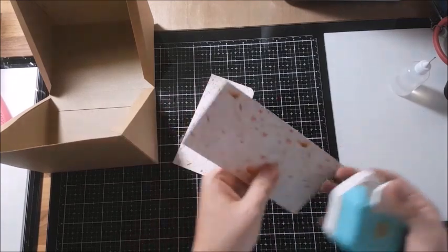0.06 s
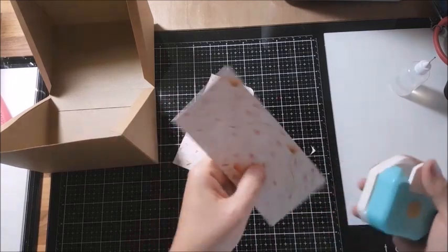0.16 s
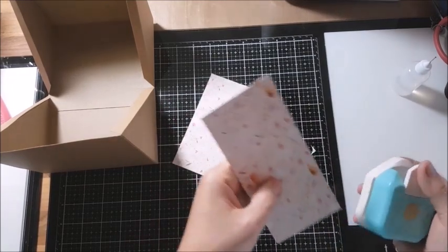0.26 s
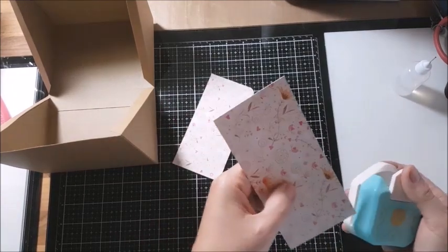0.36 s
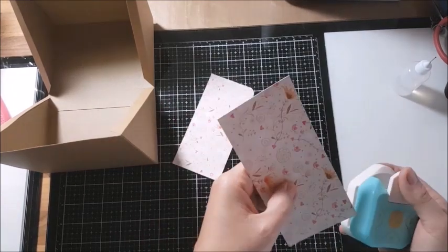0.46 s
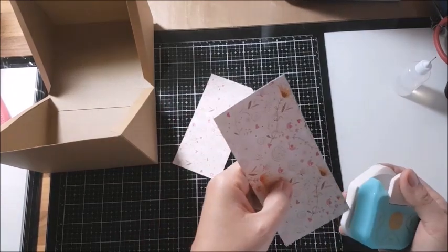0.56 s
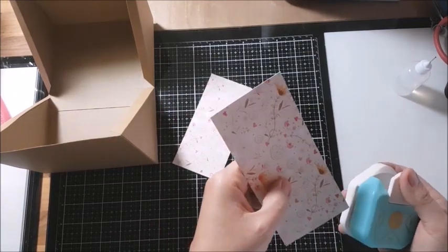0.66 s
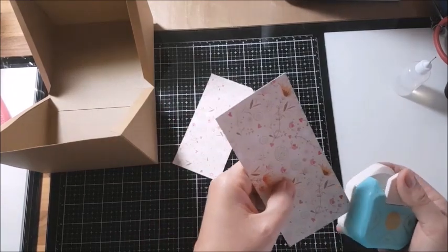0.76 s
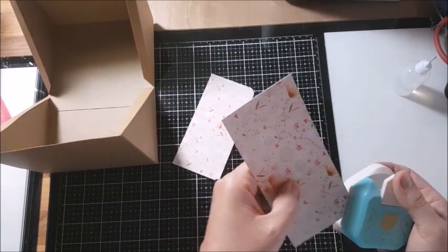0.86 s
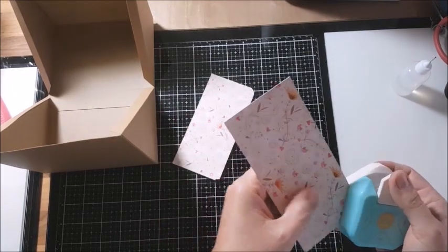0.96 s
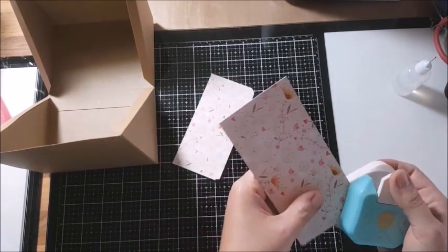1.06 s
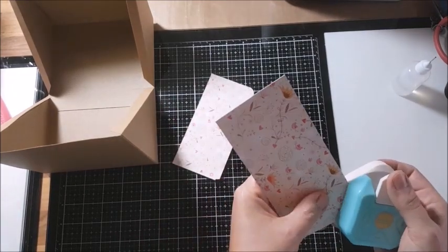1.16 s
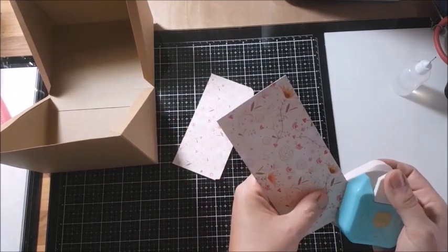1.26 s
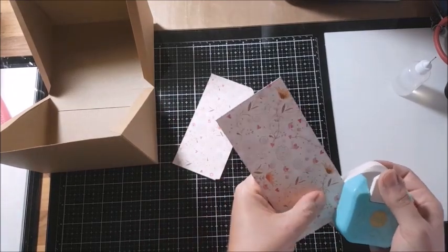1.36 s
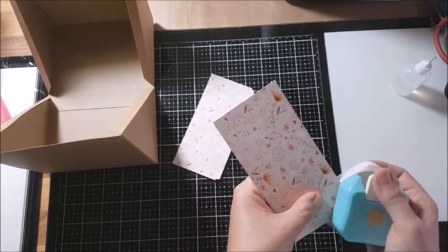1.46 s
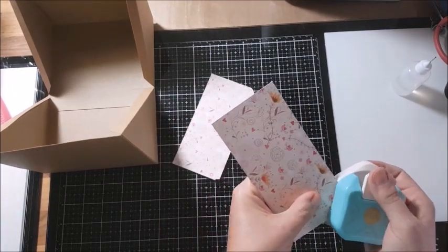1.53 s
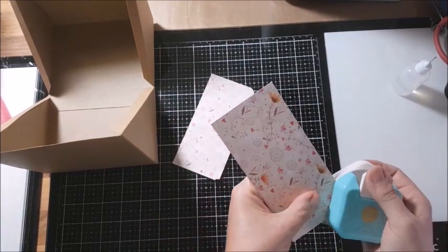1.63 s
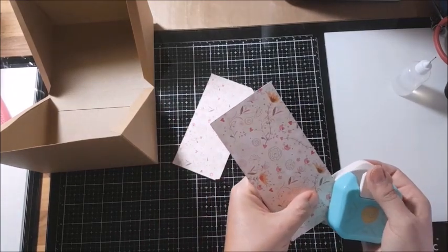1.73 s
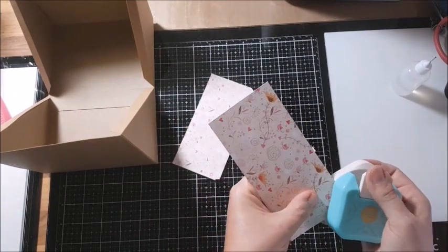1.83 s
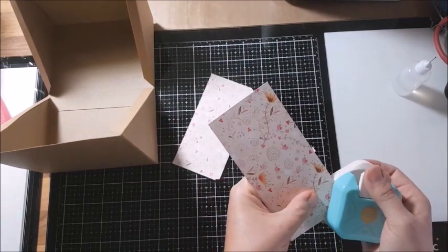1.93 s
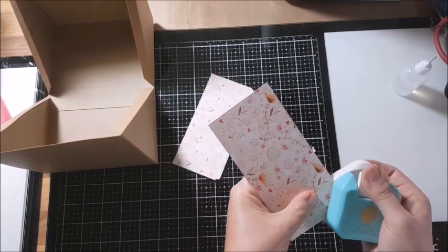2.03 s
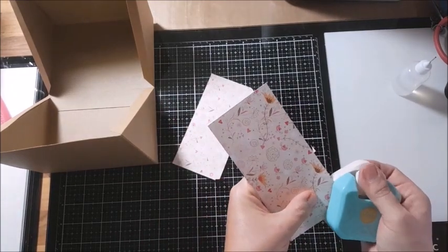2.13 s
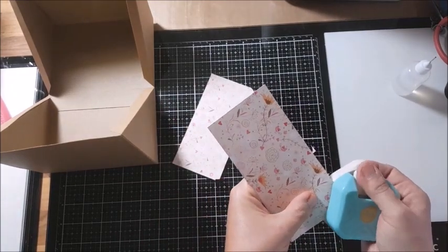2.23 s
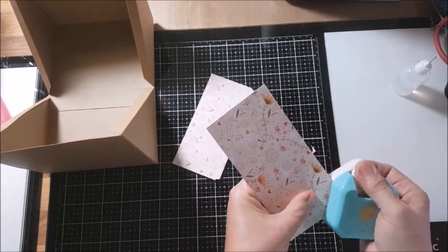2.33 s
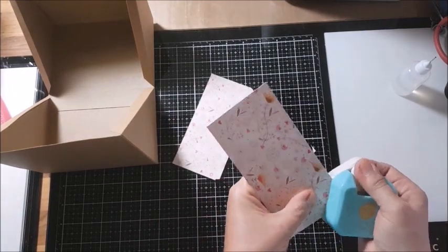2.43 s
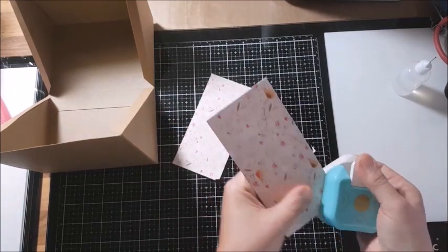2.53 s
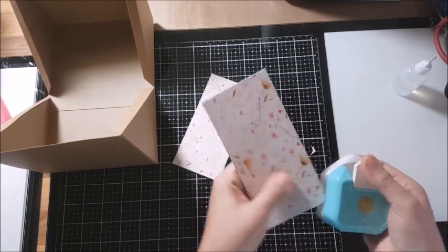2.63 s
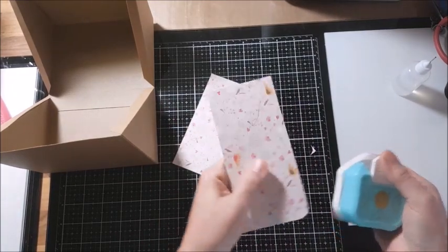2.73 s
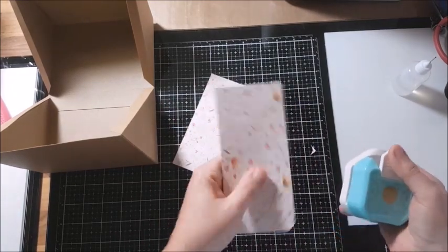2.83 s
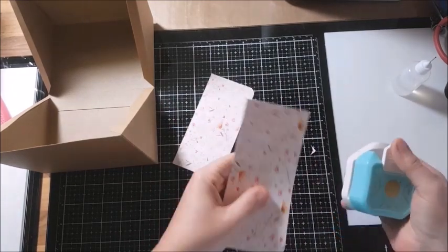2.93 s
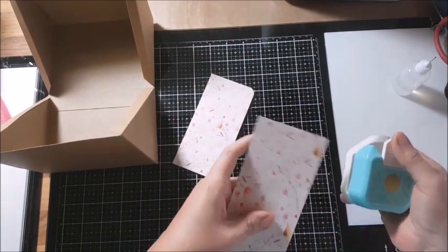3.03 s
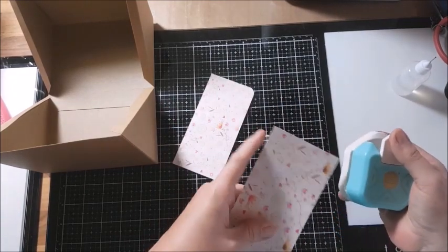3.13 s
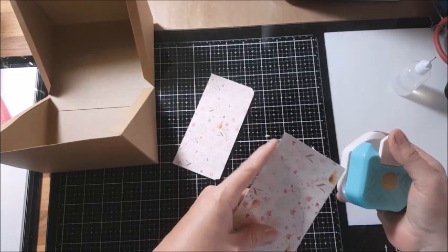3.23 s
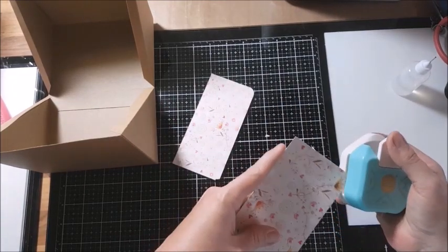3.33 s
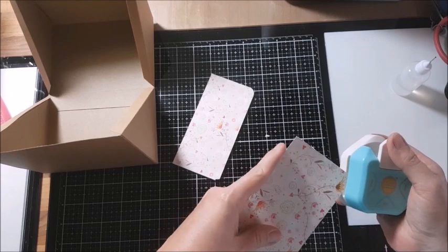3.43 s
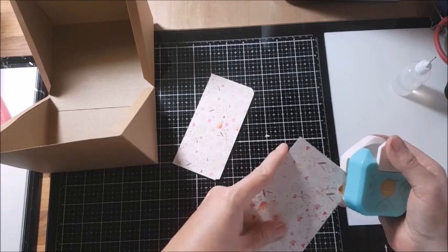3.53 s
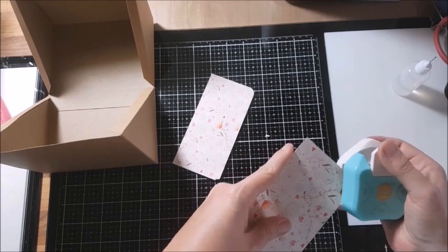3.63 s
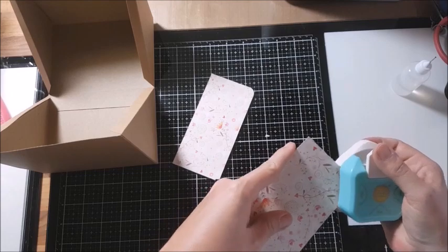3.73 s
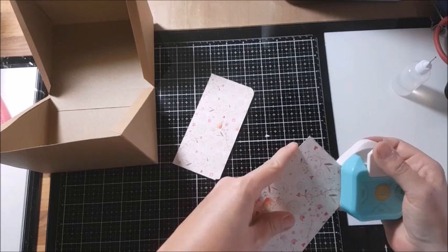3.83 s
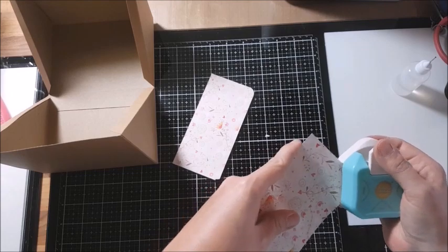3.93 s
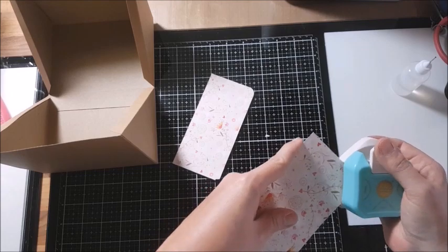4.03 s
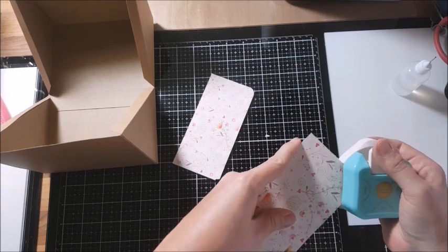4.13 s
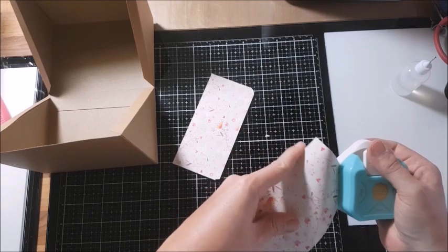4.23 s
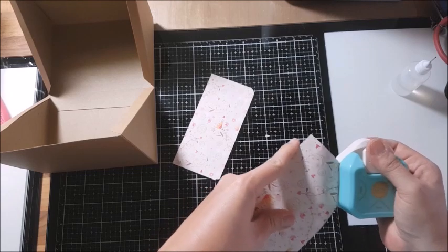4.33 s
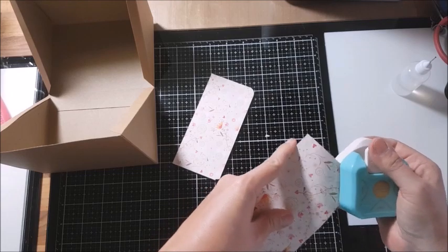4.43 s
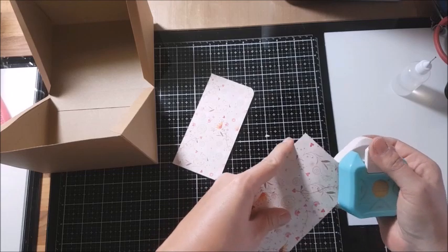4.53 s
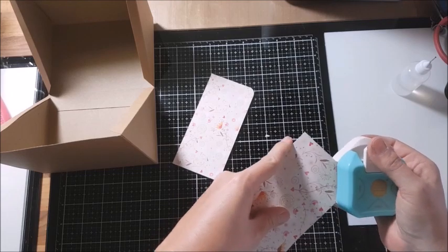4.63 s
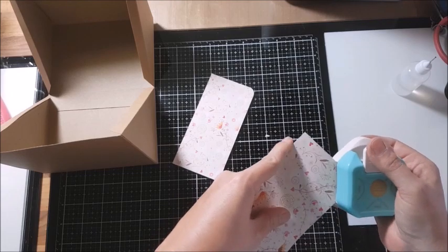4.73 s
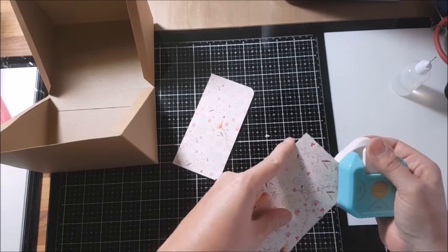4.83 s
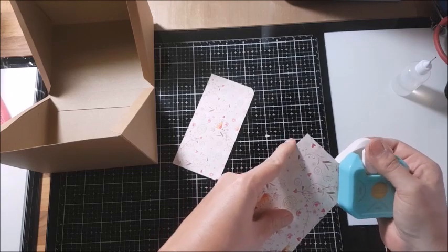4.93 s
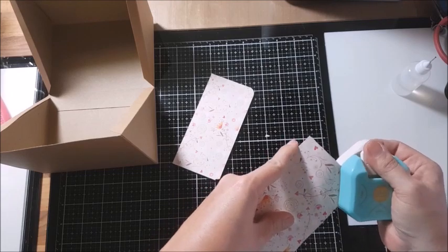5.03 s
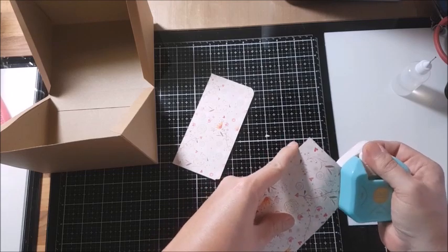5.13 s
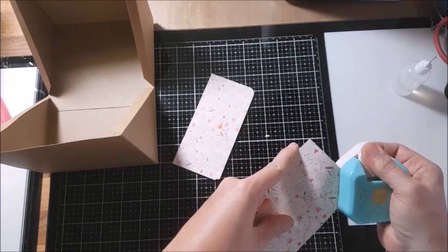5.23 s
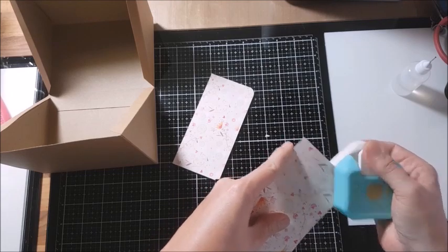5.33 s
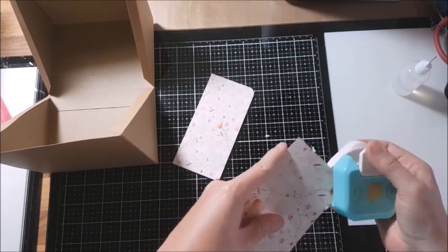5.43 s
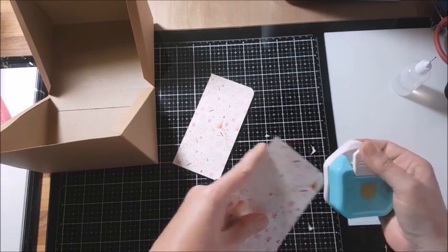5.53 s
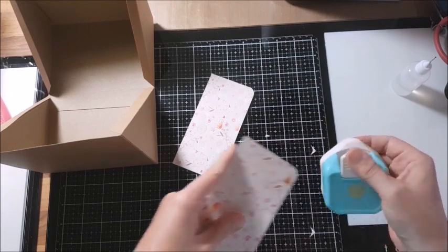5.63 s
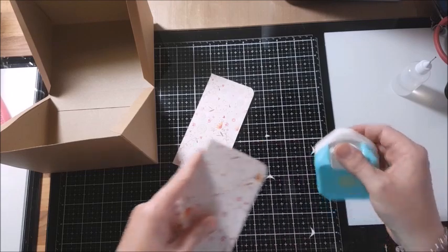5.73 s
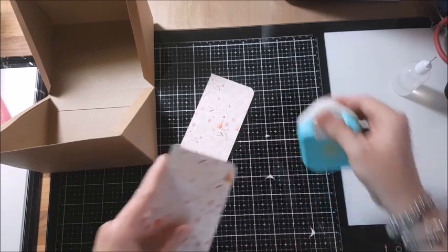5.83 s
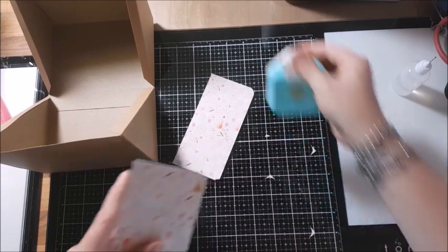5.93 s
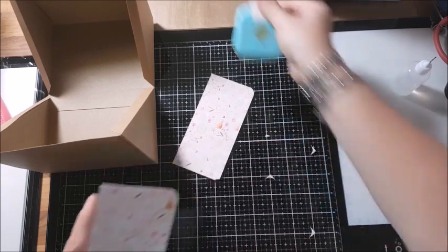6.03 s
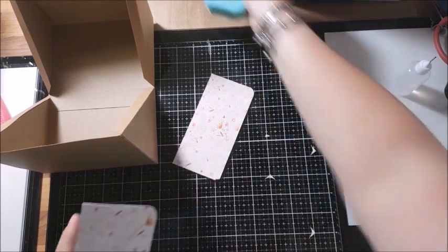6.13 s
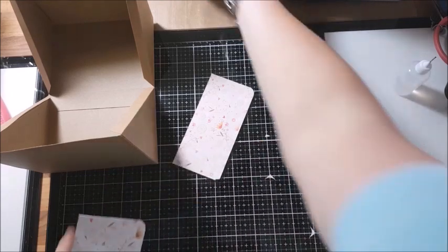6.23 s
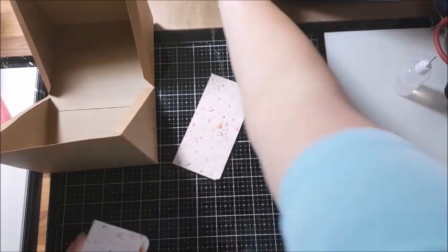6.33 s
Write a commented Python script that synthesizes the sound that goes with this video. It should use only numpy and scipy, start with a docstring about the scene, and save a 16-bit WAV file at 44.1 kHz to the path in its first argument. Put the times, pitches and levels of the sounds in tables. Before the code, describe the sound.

A close stereo pickup in a small room, hands slightly right of centre, over quiet, airy fan noise. From 0 to 1.3 s there are faint card slides, a hollow palm shift and tiny plastic bumps at 0.05 and 0.67. At 2.2 a light knock and short gritty rub lead to a very loud, bright snap at 2.39, with dry plastic ring, thin spring note and quick wall echoes. A sharp double click releases the lever at 2.62. The fan dips around 2.85 and creeps back while card hisses near 3.0. Small knocks come at 3.54 and 3.65. The bent card pops crisply at 4.41, with smaller crackles around it. Soft taps and rubbing from 5.04 precede the second loud snap at 5.24; a quick rattling release follows at 5.43-5.49, with a faint scrape. From 5.9 light card slides and the punch gently skidding aside close the scene by about 6.5.

```python
"""Corner punch on card, small room

Close stereo microphone at a craft table, hands a little to the right: a plastic punch rounds two card corners.
Noise-driven jerks make the scrapes; damped modes and a noise crack make each snap, with a thin spring note.
Before, between and after the cuts, shaped noise is card sliding and palm shifting; at the end the punch
slides aside. Parts knock and the bent card pops; the walls answer with noise echoes. Filtered noise is a
background fan, heard to drop for a moment after the first snap and creep back."""
import sys
import numpy as np
from scipy import signal
from scipy.fft import rfft, irfft, next_fast_len
from scipy.io import wavfile
from scipy.ndimage import uniform_filter1d, minimum_filter1d, map_coordinates

SR = 44100
rng = np.random.default_rng(int(sys.argv[2]) if len(sys.argv) > 2 else 0)


def wav_record(signal):
    """Record a signal, one row per channel, as 16-bit PCM in the file named by sys.argv[1]."""
    frames = np.transpose(np.atleast_2d(signal))
    bounded = np.clip(frames, -1, 1)
    # unit amplitude maps onto the largest positive 16-bit level
    quanta = np.round(bounded * 32767).astype(np.int16)
    wavfile.write(sys.argv[1], SR, quanta)


N = 281446  # length [samples]
T = np.arange(SR // 2) / SR  # time axis of one short sound [s]

# Fan air noise: (frequency [Hz], level [dB])
FAN_AIR_SPECTRUM = [(20, -14), (45, -19), (100, -11.5), (220, -11.5), (320, -6), (395, -1.5), (540, -7),
                    (800, -3.5), (1050, -5.5), (1850, -2), (2400, -8.5), (3500, -19), (6000, -27.5),
                    (10000, -30), (15000, -28)]
# Fan likeness at the two microphone ports: (frequency [Hz], left-right correlation [0-1])
FAN_LIKENESS = [(60, 0.098), (300, 0.36), (640, 0.65), (1400, 0.11), (3000, .25), (8000, .05)]
# Fan balance: (frequency [Hz], left minus right [dB])
FAN_BALANCE = [(60, 3), (200, -2.5), (700, -1.5), (2000, -4), (4400, -2), (9000, 3)]
FAN_DB = -55
# the fan noise drops for a moment after the first snap: lowest time, depth, fall and recovery
SAG_S, SAG_DB, SAG_FALL_S, SAG_RECOVER_S = 2.85, -3.5, 0.26, 0.42

# Palm shifting on the hollow case: (start [s], length [s], level [dB])
PALM_SHIFTS = [(-.1, 0.54, -63.5), (.35, 0.63, -59), (1.2, 0.55, -68), (3.4, 0.62, -63.5),
               (4.1, 0.7, -66.5), (6.1, 0.54, -55.5)]
# Hollow case under the palm: (frequency [Hz], level [dB])
HOLLOW_SPECTRUM = [(40, -25), (220, -21), (300, -11.5), (340, 1), (400, -13.5), (600, -20.5), (1200, -19),
                   (2700, -26), (4000, -32), (5200, -34), (6500, -65)]
# Fingers sliding over the card: (start [s], length [s], level [dB])
CARD_SLIDES = [(.02, .13, -63), (.28, 0.027, -70), (.43, .11, -68), (.62, 0.034, -63), (.94, .19, -65),
               (1.04, 0.053, -65.5), (1.195, 0.05, -60.5), (2.71, 0.16, -67), (2.925, .11, -63),
               (3.02, 0.075, -58), (3.60, 0.077, -70), (3.765, 0.048, -69), (3.985, 0.037, -70),
               (4.26, 0.054, -65), (4.55, 0.067, -76), (5.87, 0.21, -75), (6.04, 0.25, -71),
               (6.178, 0.02, -58), (6.225, .03, -67), (6.305, 0.043, -56.5)]
# Card hiss between the fingers: (frequency [Hz], level [dB])
PAPER_SPECTRUM = [(500, -5), (2000, -4.5), (3000, 2.5), (6000, -2), (8200, 2.5), (10000, -2.5), (14000, 1),
                  (16000, -17)]
# Punch sliding aside: (frequency [Hz], level [dB])
SKID_SPECTRUM = [(300, -26), (1100, -2), (2700, -1), (3800, -25), (4700, -2), (5200, 3), (6000, -24),
                 (15000, -25.5)]
PALM_EDGE_S, SLIDE_EDGE_S = 0.25, 0.009  # longest rise and fall of a movement
SKID_S, SKID_LENGTH_S, SKID_DB, SKID_EDGE_S = 6.17, .4, -62.5, 0.28

# Plastic and card bumping: (time [s], knock level [dB], knock frequency [Hz], tick level [dB])
CONTACTS = [(.045, -25, 480, -34), (.062, -29, 466, -48), (.667, -32, 422, -44), (2.1835, -32, 600, -33),
            (2.2565, -19, 616, -23), (2.6032, -28.5, 640, -39), (2.617, -20, 1540, -42),
            (2.6217, -11, 1560, -12), (2.6231, -15, 2810, -13), (3.5365, -24.5, 530, -37.5),
            (3.538, -42, 4200, -47), (3.647, -33, 605, -39), (4.530, -28.5, 657, -26.5),
            (5.0955, -20.5, 555, -25), (5.1005, -23.5, 680, -24), (5.4309, -25.5, 637, -24.5),
            (5.4693, -16.5, 460, -24), (5.4725, -15.5, 990, -24), (5.4785, -18, 1575, -18),
            (5.4903, -27, 2840, -18.5)]
# Dry tick of a contact: (frequency [Hz], level [dB])
TICK_SPECTRUM = [(100, -20), (400, -9.5), (900, -10), (1700, 3.5), (3100, -4), (5000, -9.5), (8200, -12.5),
                 (10500, -11), (15000, -16)]
TICK_T60_S = .013
# Bass-shy radiation of the small case: (frequency [Hz], gain [dB])
CASE_RADIATION = [(30, -17), (120, -5), (220, -24), (340, 4), (1000, 1)]

# Card buckling: (time [s], level [dB])
BUCKLES = [(0.2372, -32.5), (4.3243, -22), (4.4117, -4), (4.4182, -11), (4.525, -33), (4.538, -29),
           (4.563, -29.5)]
# Papery crack of the bent card: (frequency [Hz], level [dB])
BUCKLE_SPECTRUM = [(100, -40), (350, -24), (1150, -16), (1850, -0.5), (2400, -7), (3000, -1.5),
                   (4200, -9.5), (6200, -13.5), (8500, -17.5), (10500, -26), (13500, -22), (16000, -39)]

# Lever rubbing in its guide, down and up; last row: card drawn out of the punch:
# (start [s], length [s], groan level [dB], grit level [dB], swell per jerk [dB])
RUBS = [(2.188, .071, -51.5, -53.5, 1.04), (2.617, 0.026, -50, -43, -11), (5.039, 0.062, -55.5, -57.5, 6.5),
        (5.468, 0.047, -38.5, -40.5, -15), (5.576, 0.076, -53.5, -63, -0.5)]
# Shuddering case: (frequency [Hz], level [dB])
GROAN_SPECTRUM = [(60, -24), (280, -18), (450, -0.5), (660, 1.5), (880, -10), (1550, -3.5), (2600, -2.5),
                  (3800, -10.5), (6000, -23), (15000, -37)]
# Hiss of the rubbing faces: (frequency [Hz], level [dB])
GRIT_SPECTRUM = [(100, -23.5), (700, -13.5), (1600, -1.5), (2600, 1), (4000, -2.5), (6500, -5), (8200, 6),
                 (9500, -8.5), (14000, -4.5), (16000, -14)]
JERK_SPACING_S, JERK_WIDTH_S = .026, 0.0063  # nominal spacing; standard deviation of one jerk

# Blade breaking through:
# (time [s], shell [dB], bass change [dB], crack [dB], crack tilt [dB per octave], long ring change [dB])
BLADE_SNAPS = [(2.3875, 0.5, -1.5, 7, -1, -5), (5.2362, -3.5, 5.5, 9, -0.6, -7)]
# Punch case modes, damped shell then long faint ring: (frequency [Hz], relative level [dB], t60 [s])
PUNCH_MODES = [(417, -12.5, 0.012), (545, -15, 0.009), (1361, 9.5, 0.0096), (1525, -5.5, 0.016),
               (2190, -11, 0.011), (3150, -10, 0.0039), (3996, 0, 0.0089), (354.5, -37.5, 0.13),
               (744, -33.5, 0.18), (1299, -18, 0.14), (1380, -36, 0.19), (1509, -37, 0.18),
               (3900, -33.5, 0.17), (4000, -37, 0.11)]
# Card shearing, before the tilt of each snap: (frequency [Hz], level [dB])
SHEAR_SPECTRUM = [(60, -18), (250, -7.5), (900, -10), (2000, 1.5), (3100, 5.5), (4200, 6), (5800, 0.5),
                  (7200, 4.5), (8200, 2.5), (10000, -3.5), (12000, -0.5), (13000, 8), (14200, 0.5),
                  (15800, -8)]
SHARP_ATTACK_S = .0002

# Jolted return spring: (time [s], level [dB])
SPRING_JOLTS = [(2.388, -44), (5.237, -40)]

# Room decay: (frequency [Hz], t60 [s])
ROOM_DECAY = [(150, 0.13), (500, 0.22), (1400, 0.18), (4000, 0.24), (8000, 0.21), (15000, 0.18)]
# Wall colour: (frequency [Hz], relative reflected level [dB])
WALL_REFLECTION = [(150, -10.5), (450, -1.5), (1000, -2.5), (1400, 3.5), (3500, 4), (5500, 2.5), (8000, 5),
                   (14000, 5)]
FIRST_WALL_S, CRACK_WET_DB, RUBBING_WET_DB = .0098, -4.3, -4

LIMITER_S, TOP_HZ = .0006, 15900


def amp(db):
    """Decibels to gain."""
    return 10 ** (np.asarray(db) / 20)


def unit(x):
    """Scale to rms 1."""
    return x / np.sqrt(np.mean(x ** 2) + 1e-20)


def packet(x):
    """Scale to energy 1."""
    return x / np.linalg.norm(x)


def along(points, hz):
    """Read (frequency [Hz], value) points on a log frequency axis."""
    f, v = np.transpose(points)
    return np.interp(np.log(hz + 1), np.log(f + 1), v)


def wobble(rate):
    """A smooth random curve with rate knots a second."""
    knots = rng.standard_normal(int(N * rate / SR) + 4)
    return map_coordinates(knots, [np.arange(N) * rate / SR])


def filtered(x, response):
    """Multiply the spectrum of x by a complex response of frequency."""
    n = x.shape[-1]
    m = next_fast_len(n + SR // 4)
    return irfft(rfft(x, m) * response(np.fft.rfftfreq(m, 1 / SR)), m)[..., :n]


def coloured(x, spectrum, size=4096):
    """Colour x with a causal minimum-phase filter, made by folding the cepstrum."""
    cepstrum = irfft(np.log(amp(along(spectrum, np.fft.rfftfreq(size, 1 / SR)))))
    cepstrum[1:size // 2] *= 2
    cepstrum[size // 2 + 1:] = 0
    impulse = irfft(np.exp(rfft(cepstrum)))
    return signal.fftconvolve(x, impulse)[:len(x)]


def add(track, s, sound):
    """Mix a sound into the track at time s."""
    part = track[round(s * SR):][:len(sound)]
    part += sound[:len(part)]


def ring(hz, t60, attack):
    """One damped mode that swells smoothly over the contact time."""
    decay = amp(-60 * T / t60)
    return np.sin(2 * np.pi * hz * T) * decay * (1 - np.exp(-(T / attack) ** 2))


def burst(spectrum, t60, attack=SHARP_ATTACK_S):
    """A short spray of tiny fractures: decaying coloured noise of energy 1."""
    shape = amp(-60 * T / t60) * (1 - np.exp(-T / attack))
    return packet(coloured(rng.standard_normal(len(T)) * shape, spectrum))


def friction(spectrum, rate, rough_db):
    """Stick-slip noise of rms 1, its level wandering with rate knots a second."""
    rough = rng.standard_normal(N) * amp(rough_db * wobble(rate))
    return unit(coloured(rough, spectrum))


def gestures(rows, edge_s):
    """Gain of (start [s], length [s], level [dB]) movements: each rises, holds if long enough, and falls."""
    t = np.arange(N) / SR
    gain = np.zeros(N)
    for s, length, db in rows:
        to_edge = np.minimum(t - s, s + length - t)
        rise = np.clip(to_edge / min(edge_s, length / 2), 0, 1)
        gain += amp(db) * np.sin(np.pi / 2 * rise)
    return gain


def from_right(pair, lag_ms, lead_db):
    """A source on the right reaches the left port later, and weaker by lead_db."""
    sides = np.array([[-.5], [.5]])
    lag_s = sides * lag_ms / 1000
    return amp(sides * lead_db) * filtered(pair, lambda hz: np.exp(2j * np.pi * hz * lag_s))


def fan():
    """Air noise, first at the right port, most alike at both in the low mids; heard to drop for a moment."""
    def mid_side(hz):
        angle = np.arccos(np.clip(along(FAN_LIKENESS, hz), -1, 1)) / 2
        return amp(along(FAN_AIR_SPECTRUM, hz)) * [np.cos(angle), np.sin(angle)]

    def balance(hz):
        return amp(along(FAN_BALANCE, hz) * np.array([[.5], [-.5]]))

    mid, side = filtered(rng.standard_normal((2, N)), mid_side)
    pair = filtered(np.array([mid + side, mid - side]), balance)
    since = np.arange(N) / SR - SAG_S
    sag = np.exp(-(since / np.where(since < 0, SAG_FALL_S, SAG_RECOVER_S)) ** 2)
    return amp(FAN_DB + SAG_DB * sag) * unit(from_right(pair, lag_ms=0.37, lead_db=0))


def handling():
    """Friction noise: palm on the hollow case, card hissing in the fingers, at last the punch slid aside."""
    palm = gestures(PALM_SHIFTS, PALM_EDGE_S) * friction(HOLLOW_SPECTRUM, rate=62, rough_db=1.5)
    hiss = gestures(CARD_SLIDES, SLIDE_EDGE_S) * friction(PAPER_SPECTRUM, rate=200, rough_db=1.0)
    slide_aside = gestures([(SKID_S, SKID_LENGTH_S, SKID_DB)], SKID_EDGE_S)
    skid = slide_aside * friction(SKID_SPECTRUM, rate=59, rough_db=1)
    return hiss + palm + skid


def knocks():
    """Light contacts: one dead note of the plastic under a dry tick."""
    out = np.zeros(N)
    for s, db, hz, tick_db in CONTACTS:
        note = amp(db) * packet(ring(hz, 0.014, attack=0.00038))
        tick = amp(tick_db) * burst(TICK_SPECTRUM, TICK_T60_S)
        add(out, s, note + tick)
    return coloured(out, CASE_RADIATION)


def pops():
    """The bent card flips over with a papery crack."""
    out = np.zeros(N)
    for s, db in BUCKLES:
        add(out, s, amp(db) * burst(BUCKLE_SPECTRUM, t60=0.016))
    return out


def scrapes():
    """Evenly spaced gritty jerks: growing as the lever goes down, fading as it rises or the card is drawn out."""
    t = np.arange(N) / SR
    groan, grit = np.zeros((2, N))
    for s, length, groan_db, grit_db, swell_db in RUBS:
        jerk_times = np.linspace(s, s + length, round(length / JERK_SPACING_S) + 1)
        for k, at in enumerate(jerk_times):
            jerk = amp(k * swell_db) * np.exp(-.5 * ((t - at) / JERK_WIDTH_S) ** 2)
            groan += amp(groan_db) * jerk
            grit += amp(grit_db) * jerk
    shudder = groan * friction(GROAN_SPECTRUM, rate=220, rough_db=0)
    return shudder + grit * friction(GRIT_SPECTRUM, rate=290, rough_db=4)


def snaps():
    """The card starts to tear, then the blade slams home and rings the modes of the case."""
    out = np.zeros(N)
    for s, db, bass_db, crack_db, tilt_db, long_db in BLADE_SNAPS:
        for hz, level, t60 in PUNCH_MODES:
            upper_db = long_db if t60 > 0.1 else 0  # only the long modes take the long ring change
            colour_db = along([(700, bass_db), (1300, upper_db)], hz)
            add(out, s, amp(db + level + colour_db) * ring(hz, t60, attack=0.0014))
        shear = [(hz, level + tilt_db * np.log2(hz / 4000)) for hz, level in SHEAR_SPECTRUM]
        first_fibres = burst(shear, t60=0.018, attack=.004)
        add(out, s - .004, amp(crack_db - 24.5) * first_fibres)
        add(out, s + 0.00038, amp(crack_db) * burst(shear, t60=0.0094, attack=0.0008))
    return coloured(out, CASE_RADIATION)


def spring():
    """With each cut the jolted steel spring sings one thin decaying note."""
    out = np.zeros(N)
    for s, db in SPRING_JOLTS:
        add(out, s, amp(db) * ring(969, t60=.6, attack=.002))
    return out


def room(x):
    """The small room builds up within a few milliseconds; each frequency dies at its own speed."""
    hz, t, z = signal.stft(rng.standard_normal((2, len(T))), SR, nperseg=256)
    decay = amp(-60 * t / along(ROOM_DECAY, hz)[:, None])
    tail = signal.istft(z * decay, SR, nperseg=256)[1][:, :len(T)]
    build = 1 - np.exp(-T / .004)
    tail = filtered(tail, lambda f: amp(along(WALL_REFLECTION, f))) * build
    return signal.fftconvolve(x[None], np.sqrt(2) * packet(tail), axes=1)[:, :N]


def scene(count=6):
    """Hands a little to the right; each of count directions sends its own version of each crack to the walls."""
    rubbing = scrapes() + handling()
    direct = from_right(snaps() + spring(), lag_ms=0.1, lead_db=3.0)
    direct += from_right(knocks() + pops() + rubbing, lag_ms=0.054, lead_db=3.0)
    delay = round(FIRST_WALL_S * SR)
    first_wall = amp(-14.5) * np.pad(snaps(), (delay, 0))[:N]
    walls = np.zeros((2, N))
    for _ in range(count):
        walls += room(amp(CRACK_WET_DB) * snaps() + amp(-4) * knocks() + amp(-6.0) * pops())
    walls /= np.sqrt(count)
    return direct + first_wall + walls + room(amp(RUBBING_WET_DB) * rubbing) + fan()


def record(dry):
    """A fast limiter turns peaks down to full scale, then a steep low-pass sets the band limit."""
    needed = 1 / np.maximum(np.abs(dry).max(axis=0), 1)
    span = round(LIMITER_S * SR)
    gain = uniform_filter1d(minimum_filter1d(needed, size=span), size=span)
    return filtered(gain * dry, lambda hz: 1 / (1 + (hz / TOP_HZ) ** 120))


dry = scene()
out = record(dry)
wav_record(out)
```